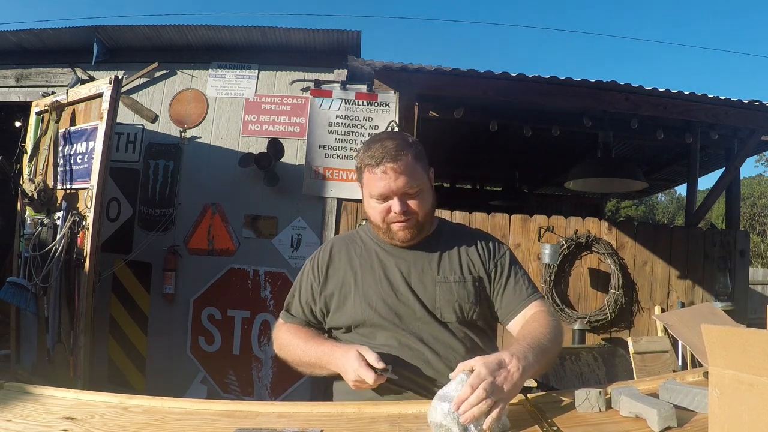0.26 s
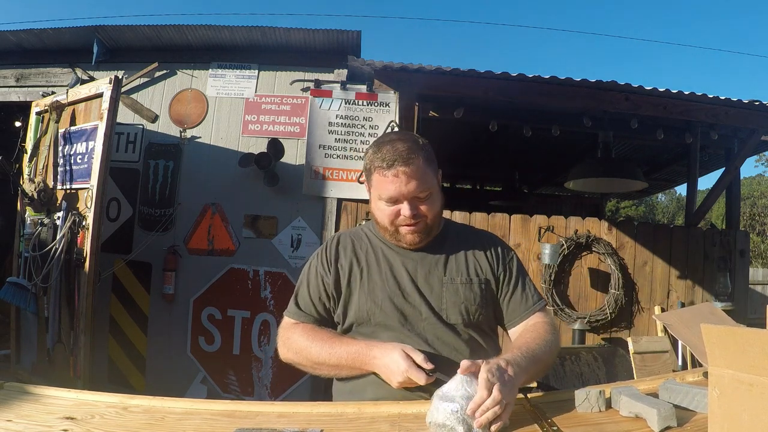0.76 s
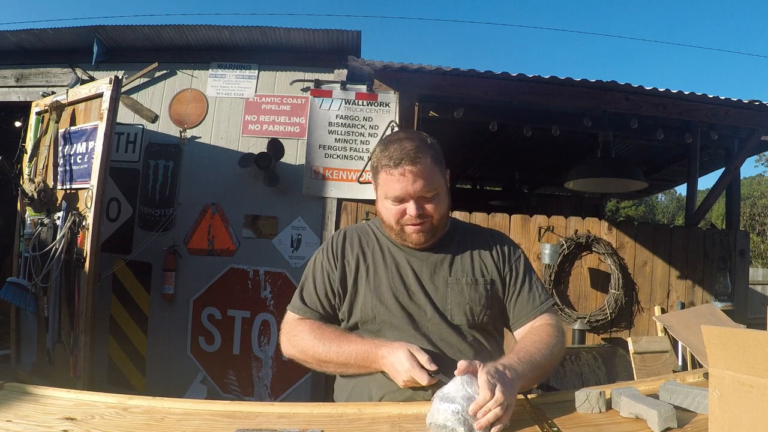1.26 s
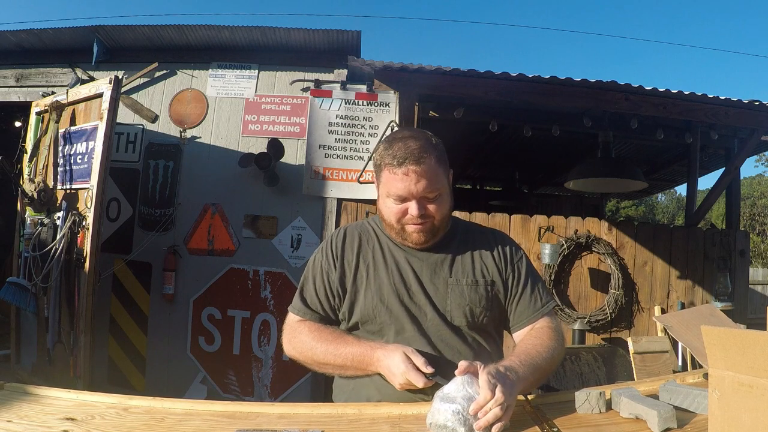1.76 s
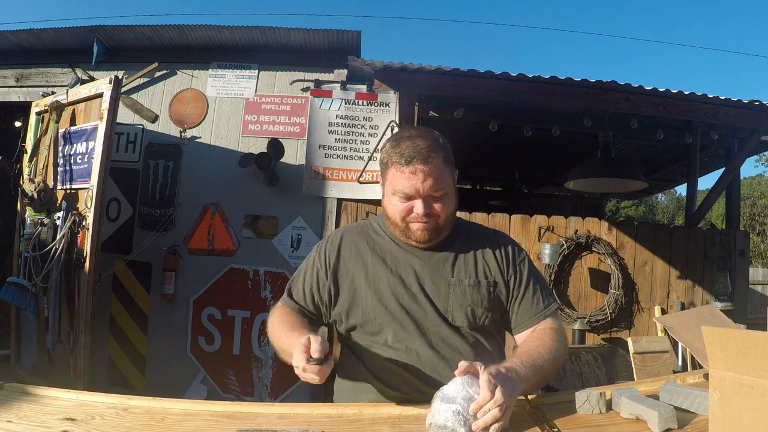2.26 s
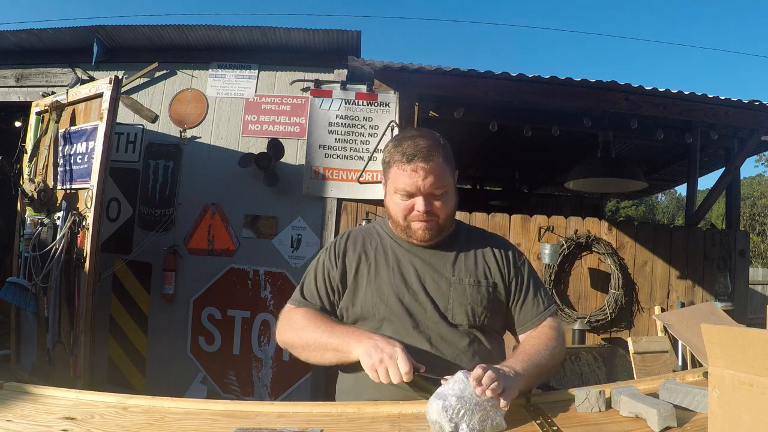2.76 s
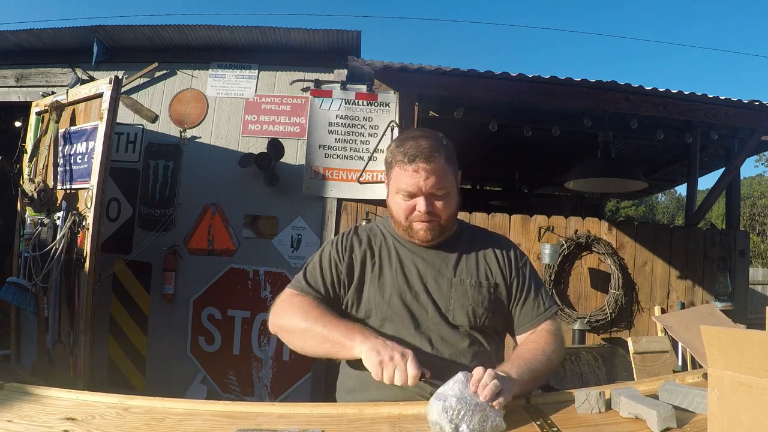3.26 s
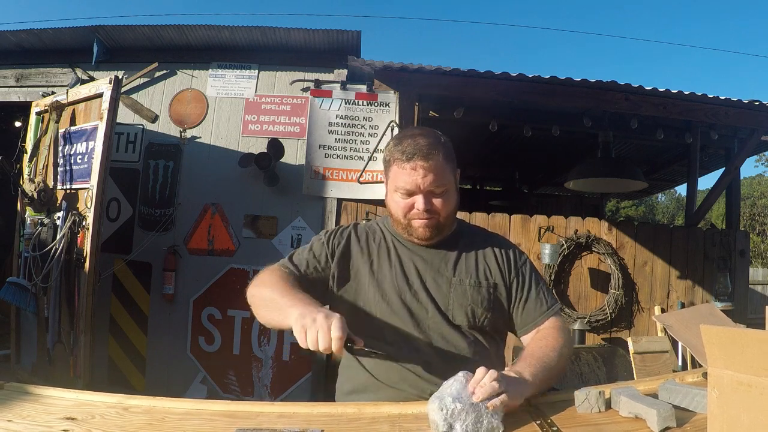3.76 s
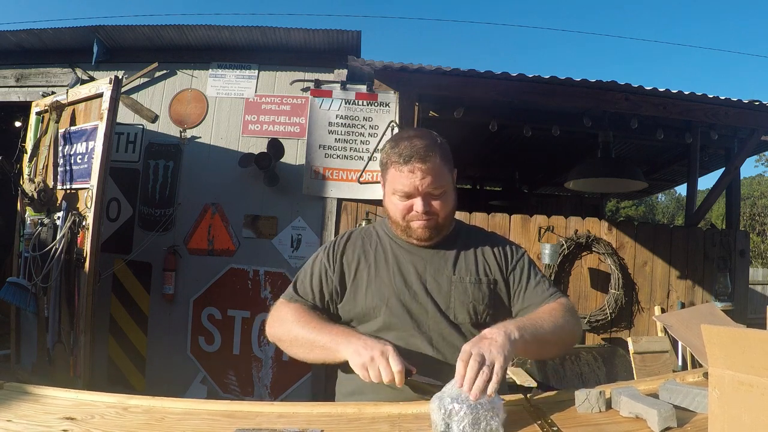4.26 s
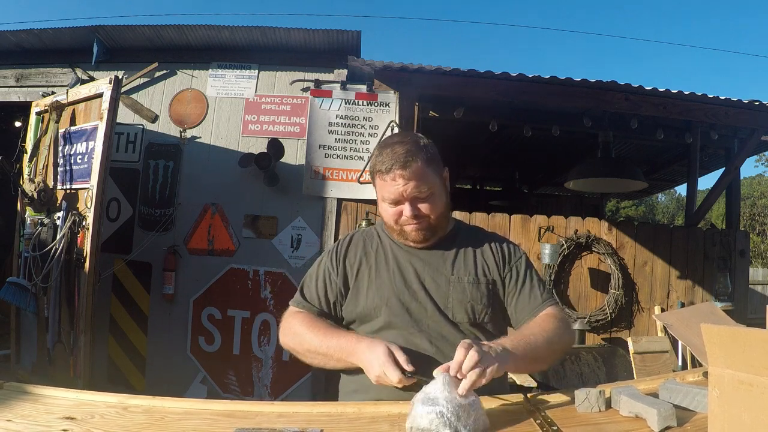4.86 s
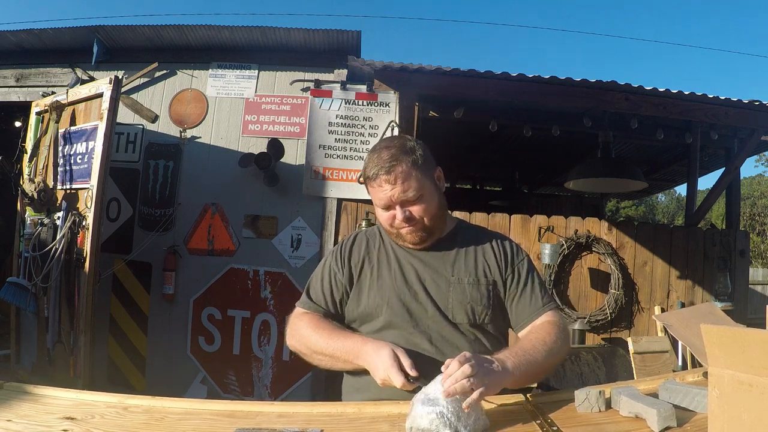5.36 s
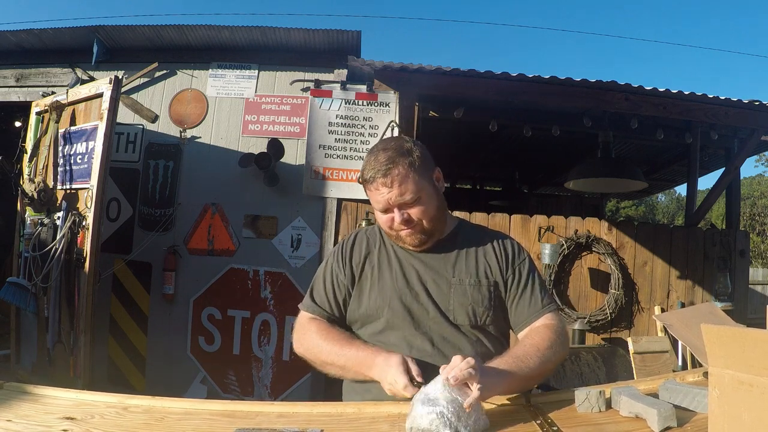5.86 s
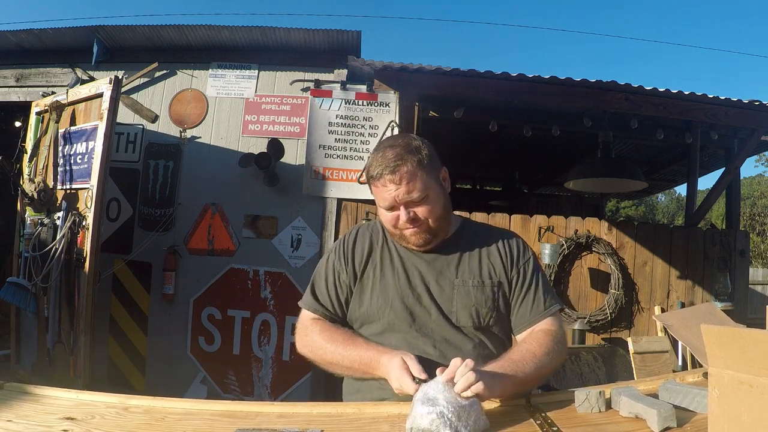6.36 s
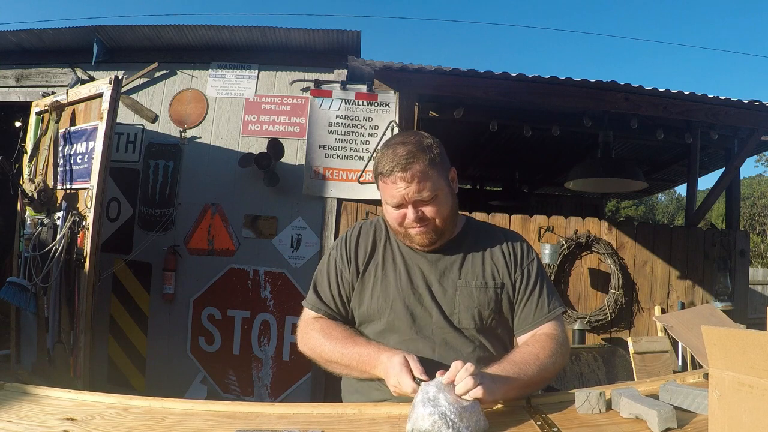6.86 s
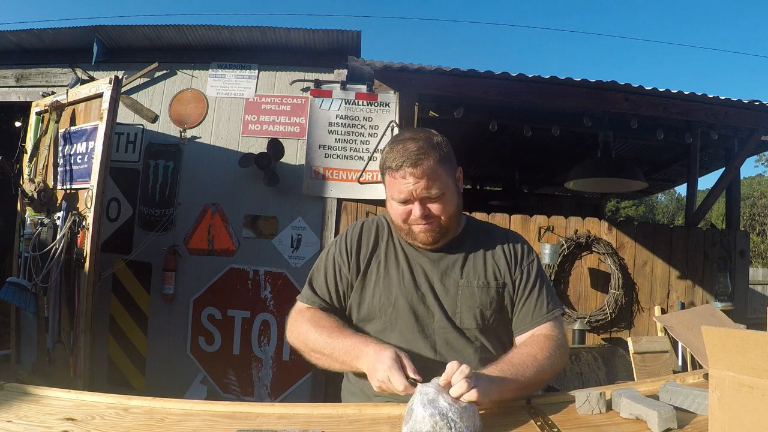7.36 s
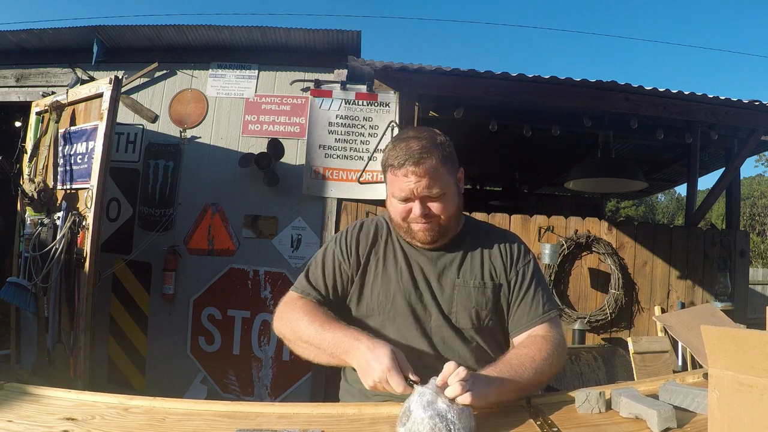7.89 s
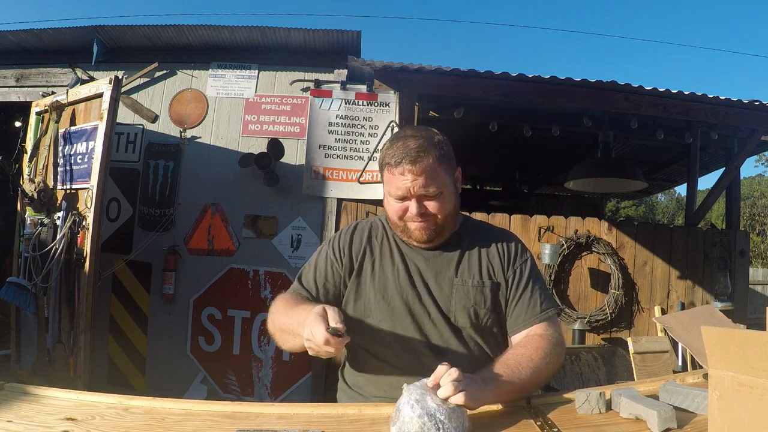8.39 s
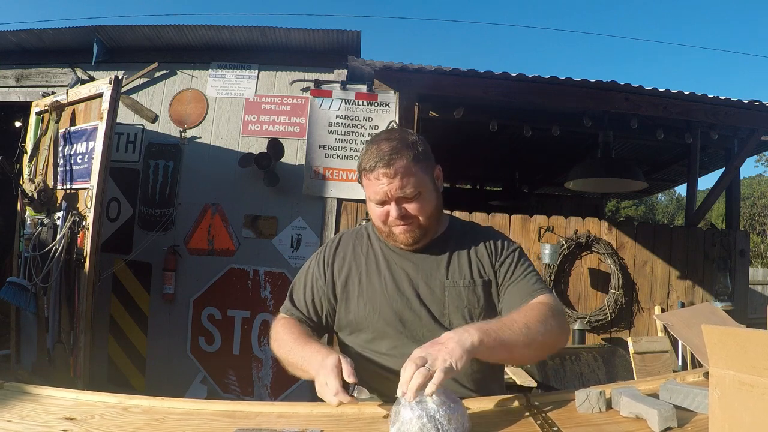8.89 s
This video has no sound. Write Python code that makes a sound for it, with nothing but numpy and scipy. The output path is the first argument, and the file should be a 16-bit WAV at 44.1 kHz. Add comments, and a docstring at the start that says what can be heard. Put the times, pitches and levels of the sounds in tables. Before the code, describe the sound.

Outdoors, a hand squeezes crinkly bubble wrap, then a knife cuts and saws through it with sharp snaps and popping bubbles while birds chirp.

```python
"""Outdoors, a low rumble, a steady hiss and a faint pulsing whistle run throughout: shaped noise.
At once a hand squeezes bubble wrap: grains of tiny ringing folds scrunch, rustle and snap; small birds glide.
From 1.9 s a knife cuts in strokes and bursts bubbles: rips of noise through resonances. The handling rests
near 5 s, then sawing grows dense from 6.5 s. Near 7.2 s and after, the parcel bumps the bench (decaying sines);
loud cracks, a dull knock and pops come around 8 s, and a few grips, bumps and snaps end it."""
import sys
import numpy as np
from scipy import signal
from scipy.fft import rfft, irfft, next_fast_len
from scipy.io import wavfile
from scipy.ndimage import uniform_filter1d, map_coordinates

SR = 44100
rng = np.random.default_rng(int(sys.argv[2]) if len(sys.argv) > 2 else 0)


def digitize_waveform(pressure):
    """Quantize a signal to 16-bit integers and store it at the path in sys.argv[1].

    Rows of a 2-D input are taken as channels; values are limited to [-1, 1].
    """
    field = np.atleast_2d(pressure).T
    bounded = np.clip(field, -1, 1)
    quanta = np.round(bounded * 32767).astype(np.int16)
    wavfile.write(sys.argv[1], SR, quanta)


N = 402544

# bursting bubbles, and one dull low knock at 7.797 s: (t/s, rip time/s, lower ring f/Hz, upper ring f/Hz,
# then relative levels of thump/dB, body/dB, crack/dB, fizz/dB); a bubble's rings are its air pocket and skin
POPS_AND_KNOCK = [(1.8855, 0.00045, 560, 1920, 19.5, 19, 9.5, -4),
                  (1.8973, 0.00072, 1220, 8400, 12, 13.5, 5.5, 3.5),
                  (2.129, 0.00025, 476, 3950, 29, 16, 12, -3.5),
                  (2.5723, 0.0002, 949, 2550, 19.5, 13.5, 2, -1.5),
                  (2.6096, 0.00011, 1520, 2210, -23, 6.5, -13, -15),
                  (3.5449, 0.0027, 1192, 4180, 13, 9.5, 2, 1), (3.5557, 0.0013, 1020, 6190, 19, 17, 6, 1.5),
                  (3.5583, 0.0013, 565, 1060, 20.5, 13, 10.5, 3),
                  (7.797, 0.000955, 633.5, 481, 9.5, -2, -12, -14),
                  (8.164, 0.00045, 407.5, 710, 20.5, 8, -5.5, -2),
                  (8.2409, 0.0011, 245, 1510, 25, 16.5, 2, 8), (8.27, 0.0023, 286, 910, 22.5, 13.5, 5, 0)]
# centres of the registers thump, body, crack and fizz: f/Hz
REGISTER_HZ = [400, 1400, 4000, 9000]
# colour of creasing film, for snaps and small ticks: (f/Hz, level/dB)
FILM_COLOUR = [(90, -44), (200, -3), (500, 6), (2000, 3), (2900, -3), (3600, 5), (6000, 0.5), (9500, 0),
               (16000, -14.5)]
# a gesture of the hand: time to build up (s), time to settle (s)
GRIP_ATTACK_S, GRIP_RELEASE_S = 0.012, 0.05


def amp(db):
    """Decibels to gain."""
    return 10 ** (np.asarray(db) / 20)


def unit(x):
    """x at rms 1."""
    return x / np.sqrt(np.mean(x ** 2) + 1e-20)


def along(points, hz):
    """(Hz, value) points read on a log frequency axis."""
    f, v = np.transpose(points)
    return np.interp(np.log(hz + 1), np.log(f + 1), v)


def wobble(rate):
    """A smooth random curve, rate knots a second."""
    knots = rng.standard_normal(int(N * rate / SR) + 4)
    return map_coordinates(knots, [np.arange(N) * rate / SR])


def filtered(x, response):
    """x times a complex response of frequency."""
    m = next_fast_len(N + SR // 2)
    return irfft(rfft(x, m) * response(np.fft.rfftfreq(m, 1 / SR)), m)[..., :N]


def causal(x, gain_db):
    """A short sound through the minimum-phase filter with this gain curve."""
    size = x.shape[-1]
    cepstrum = irfft(np.log(amp(gain_db(np.fft.rfftfreq(size, 1 / SR)))))
    # folding the cepstrum forward in time makes the filter minimum-phase
    cepstrum[1:size // 2] *= 2
    cepstrum[size // 2 + 1:] = 0
    return irfft(rfft(x) * np.exp(rfft(cepstrum)))


def add(track, s, sound):
    """Mix a sound into the track at time s."""
    room = track[..., max(round(s * SR), 0):][..., :sound.shape[-1]]
    room += sound[..., :room.shape[-1]]


def ring(hz, centre_hz, q, db):
    """Gain (dB) of one resonance whose power, db at the centre, adds to a flat response."""
    detune = q * (hz / centre_hz - centre_hz / (hz + 1))
    return 10 * np.log10(1 + amp(db) ** 2 / (1 + detune ** 2))


def background():
    """Distant outdoor rumble, slowly wavering, and a steady hiss with narrow peaks: wide filtered noise."""
    # likeness of left and right: (f/Hz, correlation)
    air_likeness = [(60, 0.86), (150, 0.75), (300, 0.39), (640, -0.51), (1400, -0.64), (4200, 0.89),
                    (7600, -0.73), (15000, 0.69)]
    # spectrum of the rumble: (f/Hz, level/dB per Hz)
    rumble_spectrum = [(20, -16), (45, -19), (105, -28), (125, -16), (148, 4), (200, 0), (280, -5),
                       (450, -6.5), (680, -11.5), (1100, -11.5), (1700, -19), (2600, -28), (5000, -91)]
    # spectrum of the hiss: (f/Hz, level/dB per Hz)
    hiss_spectrum = [(800, -14), (2400, -1.5), (3900, 5), (4600, -3.5), (5600, 0.5), (6300, 7.5),
                     (10200, 0), (11500, -5.5), (14900, -15), (15200, -50)]
    # narrow peaks in the hiss: (f/Hz, width/Hz, level/dB)
    hiss_lines = [(1920, 53, 12), (7620, 115, 15.5)]

    def air(gain):
        """Stereo noise at rms 1 with this spectrum."""
        def mid_side_gain(hz):
            turn = np.arccos(np.clip(along(air_likeness, hz), -1, 1)) / 2
            return gain(hz) * [np.cos(turn), np.sin(turn)]
        mid, side = filtered(rng.standard_normal((2, N)), mid_side_gain)
        return unit(np.array([mid + side, mid - side]))

    def peaks(hz):
        power = sum(amp(db) ** 2 / (1 + (2 * (hz - c) / w) ** 2) for c, w, db in hiss_lines)
        return np.sqrt(1 + power)

    rumble = air(lambda hz: amp(along(rumble_spectrum, hz))) * amp(-39.5 + 0.15 * wobble(5.2))
    hiss = air(lambda hz: amp(along(hiss_spectrum, hz)) * peaks(hz)) * amp(-48.5)
    return rumble + hiss * amp([[-.6], [.6]])  # the hiss leans right


def faint_whistle():
    """A fuzzy, far-off tone, narrow-band noise, pulses at a slightly uneven pace."""
    centre_hz, half_width_hz, pulses_per_s = 1976, 71, 9.2
    swing_db, level_db = 8.5, -58
    noise = rng.standard_normal((2, N))
    band = filtered(noise, lambda hz: 1 / (1 + ((hz - centre_hz) / half_width_hz) ** 2))
    beats = pulses_per_s * np.arange(N) / SR + 0.25 * wobble(2.99)
    return amp(level_db) * unit(band * amp(swing_db * np.cos(2 * np.pi * beats)))


def gestures(rows, attack_s, release_s):
    """Power of the film's noise: each gesture builds up, holds and settles."""
    t = np.arange(N) / SR
    power = np.zeros(N)
    for s, length, db in rows:
        build = np.clip(.5 + (t - s) / attack_s, 0, 1)
        settle = np.clip(.5 + (s + length - t) / release_s, 0, 1)
        power += (amp(db) * build * settle) ** 2
    return power


def effort():
    """Levels (dB) of rubbing and crinkle from holding, gripping, cutting and a shiver after each pop or knock."""
    # the hand squeezes or turns the wrap: (t/s, length/s, level/dB)
    hand_grips = [(0.01, 0.085, -40.5), (0.109, 0.19, -44), (0.387, 0.11, -46.5), (3.05, 0.21, -51),
                  (3.345, 0.12, -47), (3.738, 0.18, -47), (4.208, 0.13, -51), (4.735, 0.19, -47),
                  (5.871, .17, -49), (8.541, 0.11, -50), (8.759, 0.28, -52.5)]
    # strokes of the blade through the film: (t/s, length/s, level of the rubbing/dB)
    blade_strokes = [(1.86, 0.091, -45.5), (2.06, 0.14, -48), (2.53, 0.072, -42), (3.51, 0.09, -39),
                     (6.47, 0.17, -47), (6.89, 0.11, -43.5), (7.04, 0.059, -43), (7.14, 0.2, -42),
                     (7.35, 0.082, -45), (7.505, 0.093, -40.5), (7.615, 0.082, -39.5), (7.74, 0.067, -36),
                     (7.845, 0.07, -38.5), (7.955, 0.062, -37.5), (8.07, 0.16, -40.5),
                     (8.215, 0.072, -30.5)]
    cut_attack_s, cut_release_s = .025, 0.055
    # the wrap stirs faintly while it is only held, and rests during a pause
    held_db, held_rub_db, pause_start_s, pause_end_s = -56, 5, 4.96, 5.6
    # shiver level against the body register, and the time constant of its power
    shiver_db, shiver_s = -54, 0.047
    t = np.arange(N) / SR
    held = amp(held_db) ** 2 * ((t < pause_start_s) | (t > pause_end_s))
    grip = gestures(hand_grips, GRIP_ATTACK_S, GRIP_RELEASE_S)
    cut = gestures(blade_strokes, cut_attack_s, cut_release_s)
    shiver = np.zeros(N)
    for s, rip, lower_hz, upper_hz, thump_db, body_db, *_ in POPS_AND_KNOCK:
        add(shiver, s, (amp(body_db + shiver_db) * np.exp(-t[:SR // 2] / shiver_s)) ** 2)
    rub = amp(held_rub_db) ** 2 * held + grip + cut + shiver
    crinkle = held + grip + cut / 2
    return 10 * np.log10(np.array([rub, crinkle]) + 1e-7)


def facets(rate, spread_db, t60, low_hz=900, high_hz=13500, size=192):
    """Tiny folds flip, rate a second, each pinging briefly at a pitch of its own. Stereo, rms 1."""
    starts = np.flatnonzero(rng.random(N) < rate / SR)
    pitch, strength, place, phase = rng.random((len(starts), 4)).T[:, :, None]
    t = np.arange(size) / SR
    gain = amp(spread_db * np.minimum(-np.log(strength), 2)) / np.sqrt(rate[starts, None])
    hz = low_hz + (high_hz - low_hz) * pitch
    pings = gain * np.sin(2 * np.pi * (hz * t + phase)) * amp(-60 * t / t60)
    where = (starts[:, None] + np.arange(size)).ravel()
    sides = []
    for way in (1, -1):
        panned = pings * (1 + way * (place - .5))
        sides.append(np.bincount(where, panned.ravel(), N + size)[:N])
    return unit(np.array(sides))


def crackle(rate, spread_db, smear_rate, apart):
    """Tiny clicks of uneven size, rate a second; around smear_rate they merge into sliding noise. Stereo, rms 1."""
    sizes = amp(spread_db * np.minimum(rng.exponential(size=N), 2))
    struck = rng.random(N) < rate / SR
    clicks = unit(struck * sizes / np.sqrt(rate) * np.sign(rng.standard_normal((2, N))))
    smooth = rate / (rate + smear_rate)
    mid, side = np.sqrt(1 - smooth) * clicks + np.sqrt(smooth) * rng.standard_normal((2, N))
    return unit(np.array([mid + apart * side, mid - apart * side]))


def patchy(x, depth_db):
    """Folds open and close, so the sheet's resonances keep shifting."""
    z = signal.stft(x, nperseg=256)[2]
    field = rng.standard_normal(z.shape[1:])
    field = uniform_filter1d(uniform_filter1d(field, size=5, axis=0), size=6, axis=1)
    return signal.istft(z * amp(depth_db * unit(field)), nperseg=256)[1][:, :N]


def rustle():
    """A light grip gives single ticks, hard work a dense crinkle with sharp catches; the padded parcel rubs below."""
    # spectrum of the rubbing: (f/Hz, level/dB per Hz)
    rubbing_spectrum = [(100, -38), (200, -6), (500, -0.5), (1100, 1.5), (2000, 2), (2700, -3), (5000, -33)]
    # spectrum of the fine crinkle: (f/Hz, level/dB per Hz)
    crinkle_spectrum = [(700, -22), (1800, -12), (2800, -6.5), (3600, 5.5), (5500, 2.5), (9600, 4),
                        (11000, -4.5), (15500, -19)]
    # ticks as the film catches: rate at moderate effort, level against the crinkle
    ticks_per_s, ticks_db = 70, -5.5
    rub_db, crinkle_db = effort()
    busy = amp(.8 * (np.minimum(crinkle_db, -38) + 46.0))  # harder work flips more folds
    rate = 400 * busy
    tick_rate = ticks_per_s * busy
    clumps = unit(amp(.8 * wobble(60) + 2.5 * wobble(300)))
    grains = facets(rate, spread_db=3.5, t60=0.0013)
    grains = grains + 1.53 * crackle(rate, spread_db=1.5, smear_rate=380, apart=0.14)
    ticks = facets(tick_rate, spread_db=2.5, t60=0.0012) / 2
    ticks = ticks + crackle(tick_rate, spread_db=2.0, smear_rate=4600, apart=0.3)
    sliding = grains / 2 + crackle(rate * 10, spread_db=2, smear_rate=1200, apart=0.91)
    low = patchy(clumps * sliding, depth_db=2)
    low = unit(filtered(low, lambda hz: amp(along(rubbing_spectrum, hz))))
    bright = unit(filtered(clumps * grains, lambda hz: amp(along(crinkle_spectrum, hz))))
    crisp = patchy(ticks, depth_db=4)
    crisp = unit(filtered(crisp, lambda hz: amp(along(FILM_COLOUR, hz))))
    return amp(rub_db - 2.5) * low + amp(crinkle_db - 1.2) * (bright + amp(ticks_db) * crisp)


def scrunch():
    """The first hard squeezes press bubbles against each other, which crunch in the upper middle range."""
    # hard squeezes: (t/s, length/s, level/dB)
    hard_squeezes = [(0.015, 0.097, -47.5), (0.105, 0.19, -48.5), (.465, .02, -43)]
    # spectrum of the crunch: (f/Hz, level/dB per Hz)
    crunch_spectrum = [(1200, -16), (1700, 5), (2100, 11), (2900, -1), (3500, -2), (4200, -10), (5200, -15)]
    grains = facets(np.full(N, 480), spread_db=2, t60=0.0044, low_hz=1370, high_hz=4870)
    level = np.sqrt(gestures(hard_squeezes, GRIP_ATTACK_S, GRIP_RELEASE_S))
    return level * unit(filtered(grains, lambda hz: amp(along(crunch_spectrum, hz))))


def birds():
    """Gliding whistles with an unsteady pitch and strength, and their echo off the fence."""
    # single notes: (t/s, length/s, start f/Hz, end f/Hz, level/dB)
    single_notes = [(0.09, 0.21, 3620, 3100, -49), (1.125, 0.19, 3520, 3080, -56),
                    (2.252, 0.046, 6540, 7700, -45), (3.369, 0.18, 3700, 3197, -54),
                    (6.101, 0.047, 6370, 8030, -43)]
    # one bird repeats a rising two-part call: (t/s, level/dB)
    call_times = [(1.852, -43), (2.092, -46), (2.338, -46), (2.588, -48), (2.845, -49)]
    # the parts of that call: (delay/s, length/s, start f/Hz, end f/Hz, level/dB)
    call_notes = [(-.034, .03, 2341, 2790, -8), (0, 0.0399, 2570, 3120, -2)]
    jitter, shimmer_db = 0.0365, 4  # roughness: share of pitch, strength
    echo_s, echo_db = .036, -13
    notes = list(single_notes)
    for s, db in call_times:
        for delay, length, start_hz, end_hz, part_db in call_notes:
            notes.append((s + delay, length, start_hz, end_hz, db + part_db))
    out = np.zeros(N)
    for s, length, start_hz, end_hz, db in notes:
        u = np.linspace(0, 1, int(length * SR))

        def waver(rate):
            return np.interp(u * length * rate, np.arange(SR // 50), rng.standard_normal(SR // 50))

        hz = (start_hz + (end_hz - start_hz) * u) * (1 + jitter * waver(888))
        strength = amp(db + shimmer_db * waver(112)) * np.sin(np.pi * u)
        note = strength * np.sin(2 * np.pi * np.cumsum(hz) / SR)
        add(out, s, note)
        add(out, s + echo_s, amp(echo_db) * note)
    return out


def burst(levels, colour, rip, flutter, t60, apart, size=4096):
    """Noise swells and fades over rip seconds, then flutters briefly in the treble; levels set the registers."""
    t = np.arange(size) / SR
    tear, quiver = rng.standard_normal((2, 2, size))
    # a fast tear holds every frequency equally: keep its phase, flatten its spectrum
    tear = irfft(np.exp(1j * np.angle(rfft(tear * t / rip * np.exp(-t / rip)))))
    quiver = signal.lfilter(*signal.butter(1, 900, "high", fs=SR), quiver)
    quiver = quiver * amp(-60 * t / t60) * (1 - np.exp(-t / rip))
    mid, side = unit(unit(tear) + flutter * unit(quiver)) / np.sqrt(size)
    pair = np.array([mid + apart * side, mid - apart * side]) * (t < t[-1] / 2)
    tone = list(zip(REGISTER_HZ, levels))
    return causal(pair, lambda hz: colour(hz) + along(tone, hz))


def snaps():
    """Creases buckle and the cut edge gives way in small jerks; each rings the facet of film beside it."""
    # single creases flipping over, loud and faint, that stand out from the rustle:
    # (t/s, relative crack level/dB, facet ring f/Hz)
    crease_flips = [(0.099, -16, 2300), (0.405, -14.5, 2000), (0.4755, -14, 2400), (0.5453, -20, 3300),
                    (1.2808, -15.5, 1200), (1.4679, -18.5, 2500), (1.5262, -19.5, 2500), (1.569, -23, 2000),
                    (1.7238, -15.5, 3290), (2.2447, -15.5, 4600), (2.2767, -13.5, 5500),
                    (2.9334, -16.5, 1300), (2.9845, -22, 5500), (3.1063, -14.5, 1650), (3.117, -19, 7700),
                    (3.1611, -13, 2500), (3.255, -12, 2500), (3.3354, -14.5, 2500), (3.393, -14.5, 11500),
                    (3.4281, -15.0, 7700), (3.4705, -17.5, 11500), (3.9698, -16.5, 2000),
                    (4.073, -18.5, 7700), (4.088, -17.5, 1300), (4.2451, -18, 1300), (4.2943, -18.5, 8930),
                    (4.5763, -18.0, 8990), (4.6463, -17, 4620), (4.7068, -16.5, 700), (4.8991, -14, 2000),
                    (4.9352, -17.5, 7700), (5.8709, -21, 5500), (5.9103, -18.5, 2500),
                    (6.4022, -14.5, 5500), (6.4993, -7.5, 1293), (6.568, -15, 2520), (6.5853, -12.5, 1000),
                    (6.596, -16, 7700), (6.6581, -16, 3900), (6.793, -8.5, 3920), (6.8252, -15, 1000),
                    (6.9075, -9, 1000), (6.9157, -10.5, 3290), (6.9343, -4, 9000), (6.9737, -10.5, 2000),
                    (7.048, -15.5, 4650), (7.0603, -15, 2004), (7.0686, -13, 1000), (7.1414, -8.5, 1000),
                    (7.1953, -11, 1000), (7.2445, -12.5, 2034), (7.3466, -17, 3900), (7.3689, -11.5, 9000),
                    (7.3787, -13.5, 1000), (7.4357, -14, 7820), (7.52, -14.5, 5500), (7.5325, -11, 1650),
                    (7.6256, -8.5, 1300), (7.6485, -13.5, 6500), (7.6796, -10.5, 1650), (7.7594, -8.5, 700),
                    (7.7835, -8.5, 700), (7.8617, -12.5, 11400), (7.8991, -12, 2000), (7.9067, -12.0, 1642),
                    (7.981, -3.5, 9000), (7.9922, 1.5, 11700), (7.999, -11, 2520), (8.11, -10.5, 7690),
                    (8.1705, -4, 5540), (8.2296, -7, 4590), (8.2597, -2, 6500), (8.3722, -12, 4620),
                    (8.5228, -20.5, 3300), (8.6493, -14, 698), (8.7799, -16.5, 6460), (8.9171, -17.5, 3300)]
    flip_s, flip_scatter_db = .0003, 2.5
    tilt_db = 0.6  # a smaller facet is brighter: dB an octave gained per octave of its ring
    crack_hz = REGISTER_HZ[2]
    octaves = np.log2(np.divide(REGISTER_HZ, crack_hz))
    rips = flip_s * amp(flip_scatter_db * rng.standard_normal(len(crease_flips)))
    out = np.zeros((2, N))
    for (s, db, ring_hz), rip in zip(crease_flips, rips):
        levels = db + tilt_db * np.log2(2 * ring_hz / crack_hz) * octaves

        def film(hz):
            return along(FILM_COLOUR, hz) + ring(hz, ring_hz, q=3.03, db=7.5)

        add(out, s - rip, burst(levels, film, rip, flutter=0.59, t60=0.022, apart=0.27))
    return amp(1.36) * out


def pops_and_knock():
    """Bubbles crack at once or rip, ringing air pocket and torn skin; one dull low knock is made the same way."""
    # finer colour of these bursts: (f/Hz, level/dB)
    pop_tone = [(90, -32), (160, -7), (260, -6), (600, 0.5), (780, -3.5), (1080, 1.5), (1900, 0.5),
                (3200, -3), (3800, 1.5), (5600, 0), (9500, 4), (12000, -4), (16000, -18)]
    ring_q, lower_db, upper_db = 2.9, 5, 3
    out = np.zeros((2, N))
    for s, rip, lower_hz, upper_hz, *levels in POPS_AND_KNOCK:
        rip = max(rip, 1 / SR)

        def colour(hz):
            lower = ring(hz, lower_hz, ring_q, lower_db)
            upper = ring(hz, upper_hz, ring_q, upper_db)
            return along(pop_tone, hz) + lower + upper

        add(out, s - rip, burst(levels, colour, rip, flutter=0.73, t60=0.02, apart=0.053))
    return amp(-0.5) * out


def low_tail_and_bumps():
    """Decaying sines: the low, ringing tail of a bubble pop, then soft contacts of the parcel with the bench."""
    # 3.562 s is the low, ringing tail of the bubble pop; the later rows are the parcel bumping the
    # wooden bench: (t/s, relative level/dB, f/Hz)
    low_rings = [(3.562, -21, 250), (7.17, -28, 171.9), (7.207, -27, 185), (7.794, -27.5, 331),
                 (8.58, -26.5, 234), (8.612, -31, 170), (8.634, -28.5, 208.3)]
    out, t = np.zeros(N), np.arange(SR // 5) / SR
    for s, db, hz in low_rings:
        cycles = hz * t
        envelope = amp(-5.5 * cycles) * (1 - np.exp(-cycles / 0.41))  # dies by 5.5 dB a cycle
        add(out, s, amp(db + 7.0) * np.sin(2 * np.pi * cycles) * envelope)
    # the thin bench top radiates no deep bass
    return signal.sosfilt(signal.butter(6, 130, "high", fs=SR, output="sos"), out)


def low_cut(x):
    """The steep bass cut holds back the lowest notes, so each thump trails off in a falling tail."""
    return signal.sosfilt(signal.butter(N=24, Wn=131.3, btype="high", fs=SR, output="sos"), x)


def ports(x):
    """Sound from the bench reaches the two microphone ports with different colour and phase."""
    # level of left against right: (f/Hz, level/dB)
    port_level = [(250, 2), (700, -4.5), (1500, -4.5), (2000, 5), (2800, -7.5), (4000, 0), (7000, 1),
                  (9800, -12.5), (13000, -4)]
    # phase by which left leads right: (f/Hz, phase/rad)
    port_lead = [(200, 0.071), (700, -0.27), (1500, 1), (2200, 1), (4200, -0.68), (6000, -0.88),
                 (8000, -1.74), (14000, -1.83)]

    def pair(hz):
        # each port takes half of the difference; their mean power stays 1
        h = amp(along(port_level, hz) / 2) * np.exp(.5j * along(port_lead, hz))
        return np.array([h, 1 / h]) / np.sqrt((abs(h) ** 2 + abs(h) ** -2) / 2)

    return filtered(x, pair)


def yard(x):
    """Bench, fence and shed wall scatter a weak, short tail: noise that decays at its own pace per frequency."""
    # the yard's decay: (f/Hz, t60/s)
    yard_decay = [(200, 0.27), (1000, 0.095), (4000, 0.18), (12000, 0.12)]
    hz, t, z = signal.stft(rng.standard_normal((2, SR // 3)), SR, nperseg=256)
    decay = amp(-60 * t / along(yard_decay, hz)[:, None])
    tail = signal.istft(z * decay, SR, nperseg=256)[1]
    late = np.pad(x.mean(axis=0), (130, 0))[None]  # 130 samples, about 3 ms
    return signal.fftconvolve(late, tail / np.linalg.norm(tail[0]), axes=1)[:, :N]


def scene():
    """The wrap close by, the yard and the birds behind."""
    wrap = low_cut(pops_and_knock() + snaps() + rustle() + scrunch())
    near = ports(wrap) + amp(-12.5) * yard(wrap) + low_tail_and_bumps()
    return near + birds() + faint_whistle() + background()


def record(dry):
    """The stereo microphone's band ends sharply at 15850 Hz."""
    return filtered(dry, lambda hz: hz < 15850)


dry = scene()
out = record(dry)
digitize_waveform(out)
```